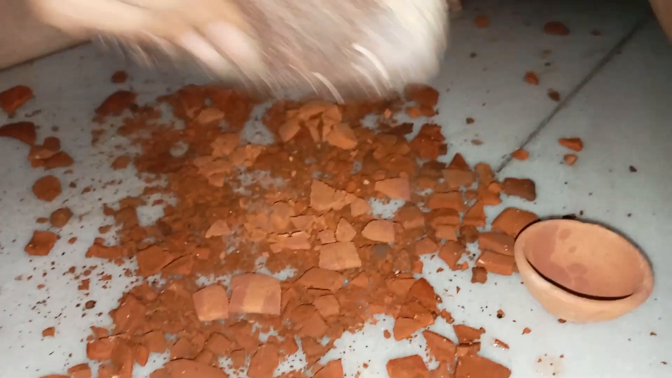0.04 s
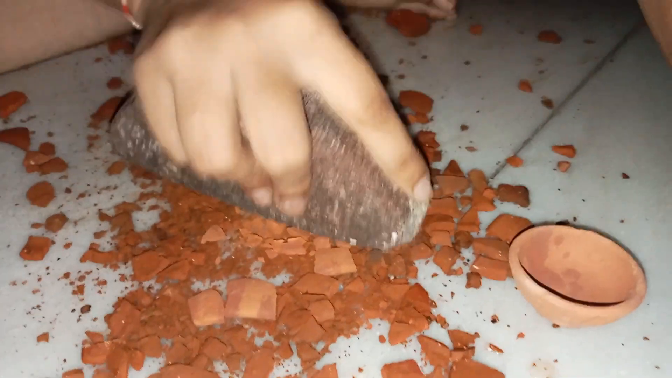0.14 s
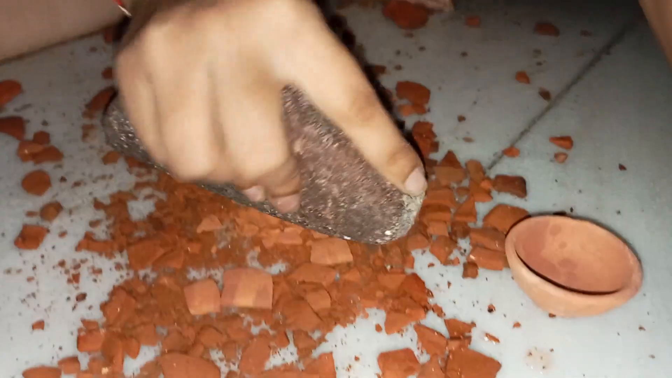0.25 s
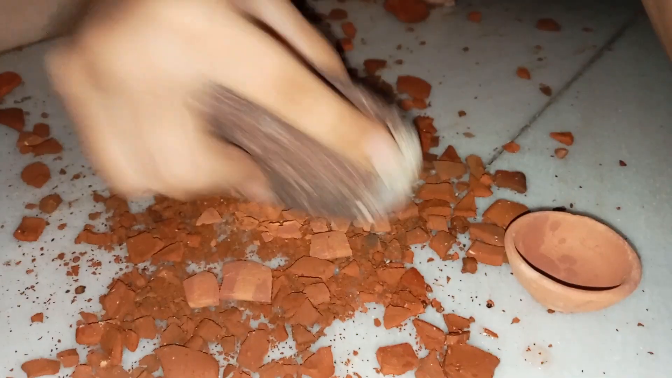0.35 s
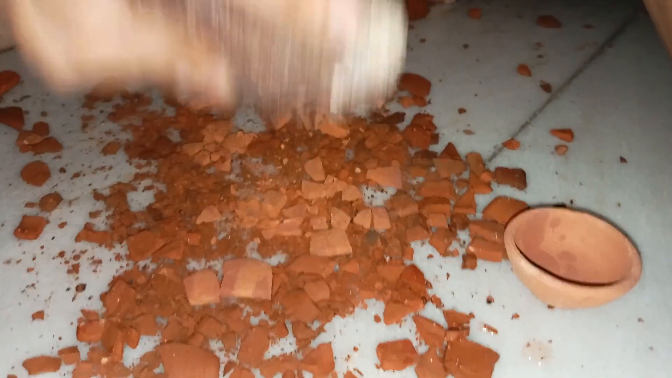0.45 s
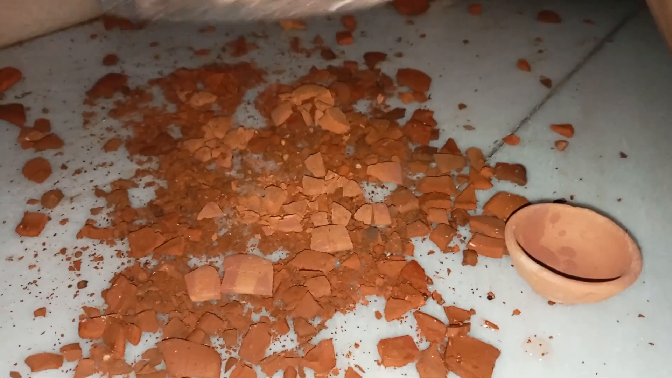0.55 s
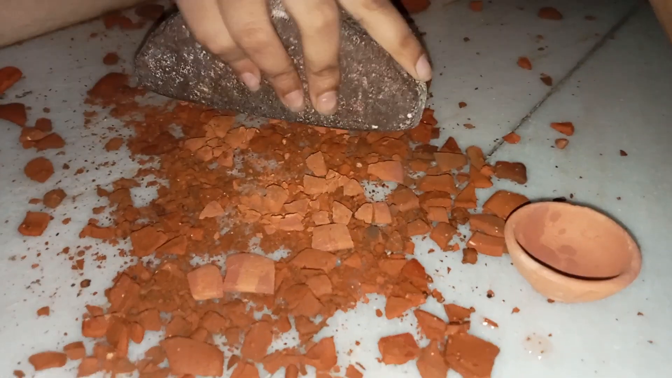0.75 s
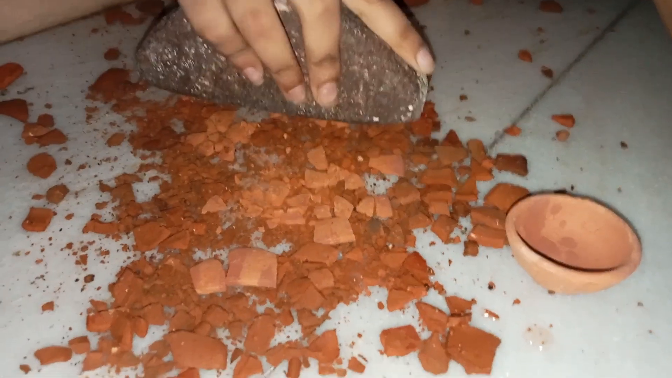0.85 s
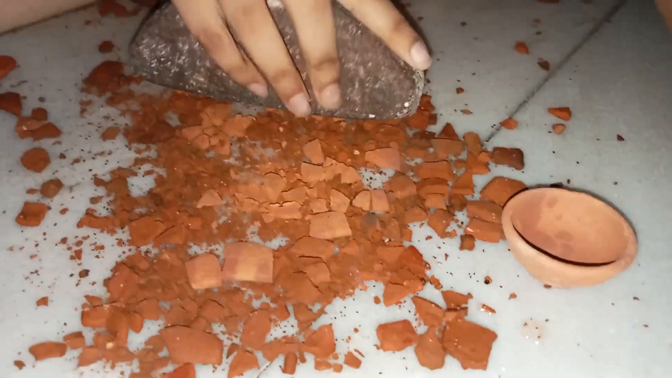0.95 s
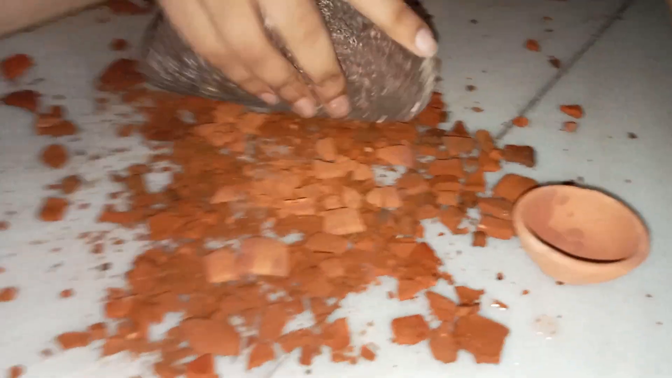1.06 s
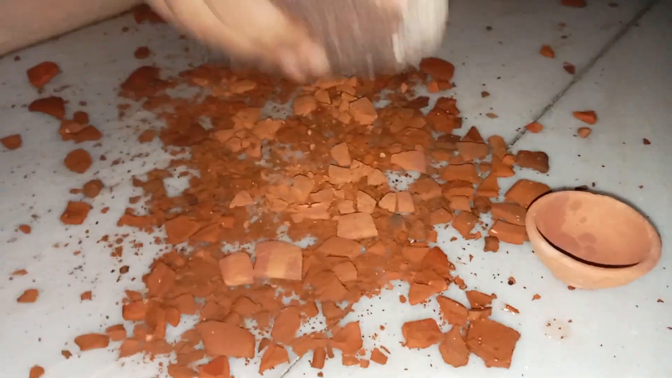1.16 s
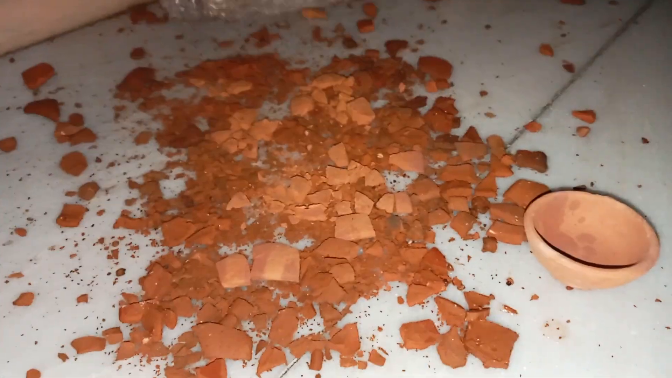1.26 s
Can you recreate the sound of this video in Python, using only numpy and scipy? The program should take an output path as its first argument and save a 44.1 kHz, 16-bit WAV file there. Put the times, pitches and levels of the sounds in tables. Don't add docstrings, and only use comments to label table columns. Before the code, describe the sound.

In a small echoing room, the ring of an earlier blow fades, then two sharp stone hits crunch clay shards against the slab. Faint chips tick and a hand shifts afterwards over low hum, close phone microphone, slightly dull treble.

```python
import sys
import numpy as np
from scipy import signal
from scipy.fft import rfft, irfft
from scipy.io import wavfile

SR = 44100
rng = np.random.default_rng(int(sys.argv[2]) if len(sys.argv) > 2 else 0)


def ratio(d):
    e = np.asarray(d, float) / 20
    return 10 ** e


def wrap_up_sound(samples):
    columns = np.atleast_2d(samples).T
    tamed = np.clip(columns, -1, 1)
    steps = np.round(tamed * 32767).astype(np.int16)
    wavfile.write(sys.argv[1], SR, steps)


N = 59535
T = np.arange(N) / SR

# pitch_hz, level_db (per Hz)
HUM_COLOUR = [(45, -15), (115, -4.5), (250, -11), (700, -18.5), (1300, -17.5), (3300, -22.5), (4300, -29),
              (5600, -45)]
HUM_DB, HISS_DB = -47.5, -73
# pitch_hz, level_db
HISS_COLOUR = [(10000, 1.5), (13000, -11)]

# start_s, level_db
RINGS = [
    (-.3, 4.5),
    (0.2306, -7),
    (0.7687, -19.5),
]
# pitch_hz, level_db (per Hz)
RING_COLOURS = [
    [(150, -15), (400, -3), (850, -12.5), (1300, -19), (2700, -22.5), (4500, -40), (9700, -29),
     (15000, -43.5)],
    [(150, 3), (300, 1.5), (850, -3.5), (1300, -17.5), (1900, -23), (2700, -18), (5000, -37), (15000, -44)],
    [(150, -4), (250, -5), (380, -1), (850, -10), (1700, -13), (4100, -19.5), (6000, -26.5), (15000, -34)],
]
# pitch_hz, t60_s
RING_T60 = [(150, 0.51), (500, 0.51), (1500, 0.44), (3500, 0.47), (7000, 0.37), (14000, 0.27)]
RING_RISE_S, RING_PATCHY_DB = 0.0021, 2
# pitch_hz, level_db, t60_s, sign (at the microphone)
LOW_MODES = [(77.0, -39.0, 0.6, 1), (80.5, -39.0, 0.6, -1), (93.5, -30.0, 0.54, 1), (100.3, -37.0, 1.0, -1),
             (110.7, -33.0, 1.0, -1), (125.6, -22.0, 0.39, 1), (135.3, -23.0, 0.35, -1),
             (144.8, -23.0, 0.55, -1), (150.6, -18.0, 0.48, -1), (161.3, -13.0, 0.35, -1),
             (174.0, -25.0, 0.61, -1), (177.3, -21.0, 0.35, 1), (196.4, -21.0, 0.37, -1),
             (214.6, -32.0, 0.52, 1), (228.4, -52.0, 1.0, 1)]
LOW_MODE_BUILD_S, LOW_MODE_LATE_S = 0.032, 0.0007
EARLIER_S, EARLIER_MODE_DB = -0.46, 17.5
DRAIN_SPLIT_HZ, DRAIN_LOW_AFTER_S, DRAIN_HIGH_AFTER_S, DRAIN_DB_PER_S = 120, 0.29, 0.22, 74
# pitch_hz, t60_s, earlier_db, first_db, second_db
UPPER_MODES = [(282, 0.4, -9.5, -24, -31.5), (355, 0.19, -12, -17, -17.5), (363.8, 0.48, -1, -31, -29),
               (408, 0.82, -36, -38, -34), (448.3, 0.44, 4, -44, -30.5), (491, 0.63, -15.5, -19.5, -37.5),
               (586, 0.37, -30, -28, -52), (664, 0.4, -26, -14.5, -35), (742, 0.48, -8.5, -19, -31.5),
               (849, 0.34, 6, -12.5, -28.5)]

# start_s, level_db (peak), brightness_hz
CRUMBS = [(.030, -44, 9000), (0.073, -50, 10500), (.0735, -48, 14000), (.094, -52, 12000),
          (0.102, -47, 9800), (.1025, -39, 5000), (.120, -52, 12500), (.169, -62, 13000),
          (.148, -55, 11500), (.192, -64.5, 12000), (.208, -51, 12000), (0.2369, -2.5, 2730),
          (0.253, -3, 2660), (0.4143, -39, 13400), (.4165, -38, 6100), (.4195, -46, 10100),
          (.4345, -46, 12100), (.439, -46, 11000), (1.0875, -34, 4600), (1.0875, -49, 7500),
          (1.0875, -58, 13000), (1.177, -49, 11300)]
# start_s, level_db, pitch_hz, t60_s
BUMPS = [
    (.097, -65, 296, .04),
    (1.129, -25.5, 71.6, 0.068),
    (1.174, -32.5, 146.3, 0.13),
    (1.235, -47, 204, 0.036),
]
RUSTLE_S, RUSTLE_LENGTH_S, RUSTLE_DB = 1.2, 0.059, -67.5

# start_s, crack_db, crack_length_s, echo_db, low_mode_db
BLOWS = [
    (0.2312, -4, 0.0017, -3, 9.5),
    (0.769, 1, 0.0028, -11.5, 3),
]
# pitch_hz, level_db (peak), t60_s
SHARDS = [
    [(1305, -8, .008), (1675, -19.5, 0.0061), (2430, -19, 0.0133), (3812, -4.5, 0.0061),
     (4650, -16, 0.0067), (5650, -10.5, 0.0054), (8800, -12.5, 0.0062), (9720, -11.5, .005),
     (11500, -19, .003), (14200, -10.5, 0.0033)],
    [(1360, -9, 0.0052), (1870, -19.5, 0.012), (2418, -17, 0.0082), (3120, -18.5, .004), (3978, -10, .012),
     (4757, -19, 0.017), (5560, -16.5, 0.0062), (6810, -16, 0.0033), (9300, -18, 0.0055),
     (10360, -15, 0.0064), (11580, -16.5, 0.011), (13200, -24, .004), (14600, -28.5, .004)],
]
CRACKS_PER_S, CRACK_SPREAD_DB = 10000, 3
CRUMBLE_DB, CRUMBLE_S = -14.5, 0.0065
SPLINTER_ABOVE_HZ, SPLINTER_S = 7000, 0.0013
IN_STEP = 0.56
# pitch_hz, width_hz, level_db, t60_s
SHARD_RINGS = [
    [(2690, 470, -27, 0.48), (9540, 690, -40, 0.32), (7900, 530, -56, .2), (11700, 1200, -48, 0.35),
     (13900, 1200, -47, 0.37), (15200, 640, -50, 0.33)],
    [(3960, 590, -39.5, 0.58), (7180, 740, -57, 0.55), (9380, 270, -49, 0.42), (10230, 1000, -44.5, 0.41),
     (11810, 800, -43.5, 0.4), (13550, 900, -56, 0.53), (15200, 900, -52, .35)],
]
# pitch_hz, level_db, t60_s, delay_s
SLAB = [
    [(150, 1.3, 0.074, 0.0011), (290, 3.0, 0.02, 0.0021), (448, 0.5, 0.02, 0.0037),
     (529, 2.6, 0.054, 0.0018), (667, -3.8, 0.071, 0.0022), (748, -2.3, 0.033, 0.0007)],
    [(141, -1.3, 0.3, 0.0015), (269, -30.0, 0.02, 0.0037), (406, -13.5, 0.3, 0.0032),
     (495, -12.0, 0.127, 0.0013), (740, -11.2, 0.021, 0.0002)],
]
SLAB_RISE_S, SLAB_DAMPED_T60_S = 0.0007, 0.025
# pitch_hz, level_db, t60_s
THUMPS = [
    (87, -11, 0.08),
    (95, -30.5, 0.024),
]
ECHO_S, ECHO_HZ, ECHO_T60_S, ECHO_LENGTH_S = 0.0155, 2613, 0.0046, 0.0016
ECHO_SHARDS_DB = -37
# level_db, low_hz, high_hz, fade_s
ECHO_GRIT = [
    (-17, 1100, 4500, .006),
    (-20, 2000, 2900, 0.0025),
]

# start_s, depth_db
DUCKS = [
    (0.235, 10.5),
    (0.77, 4.5),
]
CATCH_UP_S = 0.21
# pitch_hz, level_db
MIC_TREBLE = [(4500, 0), (6600, -9), (8200, -7), (9700, 2), (11000, -3), (12800, -7), (14500, -7),
              (15600, -8)]
MIC_TOP_HZ = 15750


def rms_one(x):
    return x / np.sqrt(np.mean(x ** 2) + 1e-20)


def at_hz(points, hz):
    table = np.array(points)
    return np.interp(np.log(hz), np.log(table[:, 0]), table[:, 1])


def colour(x, points):
    hz = np.arange(len(x) // 2 + 1) * SR / len(x) + 1
    return irfft(rfft(x) * ratio(at_hz(points, hz)), len(x))


def band_pass(x, low_hz, high_hz, order=2):
    return signal.sosfilt(signal.butter(order, [low_hz, high_hz], "band", fs=SR, output="sos"), x)


def ring(clicks, hz, t60):
    r, w = ratio(-60 / (t60 * SR)), 2 * np.pi * hz / SR
    return signal.lfilter([0, np.sin(w)], [1, -2 * r * np.cos(w), r * r], clicks + 1e-18)


def swell(t, rise):
    return 1 - np.exp(-(t / rise) ** 2)


def mode(s, hz, db, t60, rise):
    t = np.maximum(T - s, 0)
    return ratio(db - 60 * t / t60) * np.sin(2 * np.pi * hz * t) * swell(t, rise)


def drift(rate):
    r = np.exp(-80 * np.pi * rate / SR)
    slow = signal.lfilter([1], [1, -2 * r, r * r], rng.standard_normal(N // 40 + 502))[500:]
    return np.interp(np.arange(N) / 40, np.arange(len(slow)), rms_one(slow))


def puff(s, fade):
    t = T - s
    return rng.standard_normal(N) * np.exp(-np.maximum(t, 0) / fade) * (t > 0)


def hum():
    dull = colour(rng.standard_normal(N), [(20, -54.0)] + HUM_COLOUR + [(8000, -78.0)])
    hiss = colour(rng.standard_normal(N), HISS_COLOUR)
    return ratio(HUM_DB + 1.56 * drift(11)) * rms_one(dull) + ratio(HISS_DB + 1.1 * drift(6)) * hiss


def room_ring():
    out = np.zeros(N)
    edges = 170 * 2 ** np.arange(0, 6.7, 1 / 3)
    white = rng.standard_normal((2, N))
    for k, (low, high) in enumerate(zip(edges, edges[1:])):
        hz = np.sqrt(low * high)
        power = 0
        for (s, db), points in zip(RINGS, RING_COLOURS):
            t = np.maximum(T - s, 0)
            fall = ratio(db + at_hz(points, hz) - 60 * t / at_hz(RING_T60, hz))
            power = power + (fall * swell(t, RING_RISE_S)) ** 2
        patchy = ratio(RING_PATCHY_DB * drift(26))
        out += 6 * band_pass(white[k % 2], low, high, 3) * np.sqrt(power) * patchy
    return out


def low_room_modes():
    out = np.zeros(N)
    sources = [(EARLIER_S, EARLIER_MODE_DB)]
    sources += [(s + LOW_MODE_LATE_S, room_db) for s, _, _, _, room_db in BLOWS]
    for s, room_db in sources:
        for hz, db, t60, sign in LOW_MODES:
            drain_after = DRAIN_HIGH_AFTER_S if hz > DRAIN_SPLIT_HZ else DRAIN_LOW_AFTER_S
            late = np.maximum(T - max(s, 0) - drain_after, 0)
            wave = mode(s, hz, db + room_db, t60, LOW_MODE_BUILD_S)
            out += sign * wave * ratio(-DRAIN_DB_PER_S * late)
    return out


def upper_room_modes():
    out = np.zeros(N)
    for k, (hz, t60, *levels) in enumerate(UPPER_MODES):
        for (s, _), db in zip(RINGS, levels):
            out += (-1) ** k * mode(s, hz, db, t60, RING_RISE_S)
    return out


def crumbs():
    out = np.zeros(N)
    for s, db, hz in CRUMBS:
        tick = band_pass(puff(s, 0.0007), hz / 1.3, hz * 1.3)
        out += ratio(db - 8) * tick / np.abs(tick).max()
    return out


def hand():
    bumps = sum(mode(s, hz, db, t60, 0.0015) for s, db, hz, t60 in BUMPS)
    high_pass = signal.butter(3, 8000, "high", fs=SR, output="sos")
    grit = signal.sosfilt(high_pass, rng.standard_normal(N))
    stroke = np.exp(-((T - RUSTLE_S) / RUSTLE_LENGTH_S) ** 2)
    return bumps + grit * ratio(RUSTLE_DB + 2.3 * drift(47)) * stroke


def cracks(s, length):
    sizes = ratio(CRACK_SPREAD_DB * np.minimum(rng.exponential(1, N), 3)) * rng.choice([-1, 1], N)
    born = rng.random(N) < CRACKS_PER_S / SR
    times = [s - 0.0012, s, s + length / 4, s + length, s + length + 0.0006]
    burst = np.interp(T, times, [0, 0.05, 1, 0.55, 0])
    crumble = ratio(CRUMBLE_DB) * np.exp(-np.maximum(T - s, 0) / CRUMBLE_S) * (T > s)
    return 0.12 * sizes * born * (burst + crumble)


def breaking_shards():
    out = np.zeros(N)
    for (s, crack_db, length, *_), shards in zip(BLOWS, SHARDS):
        for hz, db, t60 in shards:
            run = min(length, SPLINTER_S) if hz > SPLINTER_ABOVE_HZ else length
            push = cracks(s, run) + ratio(ECHO_SHARDS_DB) * cracks(s + ECHO_S, run)
            locked = IN_STEP * np.abs(push) * np.cos(2 * np.pi * hz * T)
            shard = ring(push + locked, hz, t60)
            out += ratio(crack_db + db) * shard / np.abs(shard).max()
    return out


def shard_ring():
    out = np.zeros(N)
    for (s, *_), bands in zip(BLOWS, SHARD_RINGS):
        t = np.maximum(T - s, 0)
        for hz, width, db, t60 in bands:
            once = ring(rng.standard_normal(N), hz, 2.2 / width)
            band = rms_one(ring(once, hz, 2.2 / width))
            out += band * ratio(db - 60 * t / t60 + 2.0 * drift(30)) * swell(t, RING_RISE_S)
    return out


def slab_thud():
    out = np.zeros(N)
    for (s, *_), slab, hold_s in zip(BLOWS, SLAB, (0.021, 0.014)):
        thud = sum(mode(s + delay, hz, db, t60, SLAB_RISE_S) for hz, db, t60, delay in slab)
        out += thud * ratio(-60 * np.maximum(T - s - hold_s, 0) / SLAB_DAMPED_T60_S)
    return out


def floor_thump():
    return sum(mode(s + 0.00084, hz, db, t60, 0.006)
               for (s, *_), (hz, db, t60) in zip(BLOWS, THUMPS))


def wall_echo():
    out = np.zeros(N)
    for (s, _, _, echo_db, _), (grit_db, low_hz, high_hz, fade) in zip(BLOWS, ECHO_GRIT):
        push = np.abs(cracks(s + ECHO_S, ECHO_LENGTH_S)) * np.cos(2 * np.pi * ECHO_HZ * T)
        out += ratio(echo_db) * ring(push, ECHO_HZ, ECHO_T60_S)
        out += ratio(grit_db) * band_pass(puff(s + ECHO_S, fade), low_hz, high_hz)
    return out


def scene():
    lag_db = np.zeros(N)
    for s, depth_db in DUCKS:
        lag_db -= depth_db * np.clip(1 - (T - s) / CATCH_UP_S, 0, 1) * (T > s)
    room = room_ring() + low_room_modes() + upper_room_modes() + shard_ring()
    blows = breaking_shards() + slab_thud() + floor_thump() + wall_echo()
    return (hum() + room * ratio(lag_db) + crumbs() + hand() + blows)[None]


def top_cut(x):
    return signal.sosfilt(signal.butter(12, 16340, fs=SR, output="sos"), x)


def record(dry):
    treble = colour(dry[0], MIC_TREBLE + [(MIC_TOP_HZ, -60)])
    x = signal.sosfilt(signal.butter(2, 60, "high", fs=SR, output="sos"), treble)
    return top_cut(np.clip(x, -1, 1)[None])


dry = scene()
out = record(dry)
wrap_up_sound(out)
```